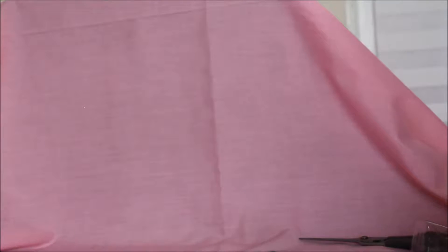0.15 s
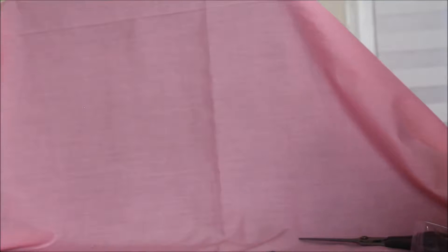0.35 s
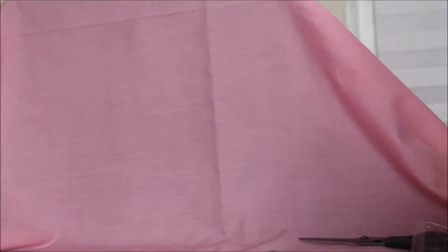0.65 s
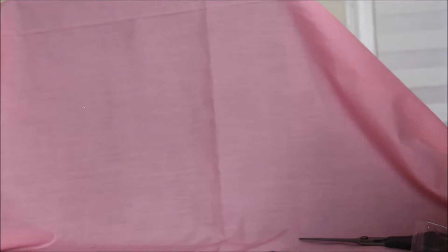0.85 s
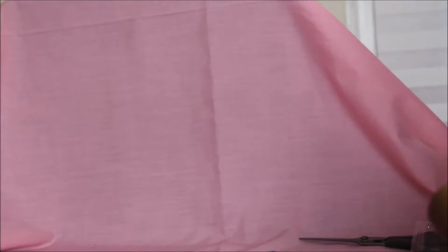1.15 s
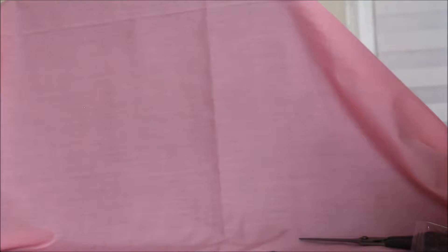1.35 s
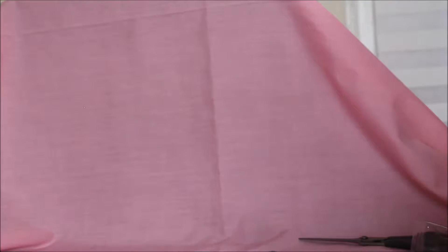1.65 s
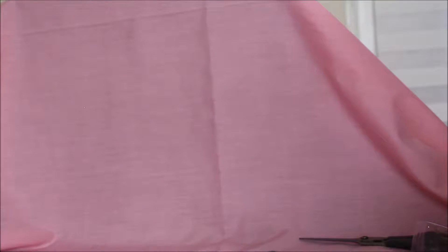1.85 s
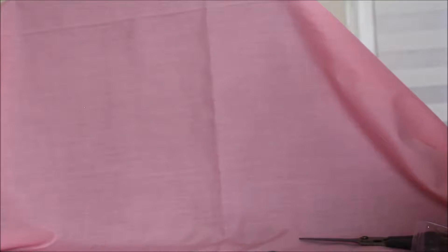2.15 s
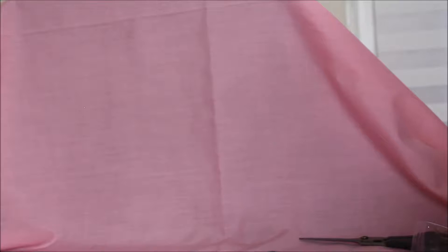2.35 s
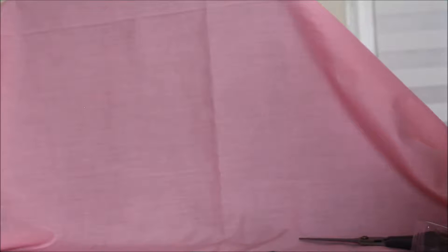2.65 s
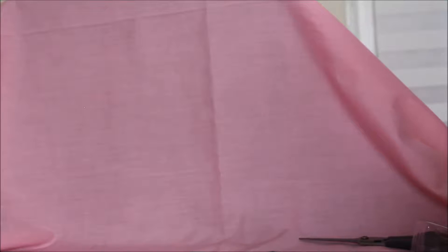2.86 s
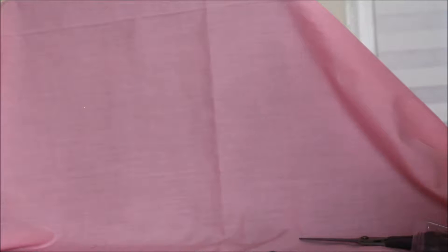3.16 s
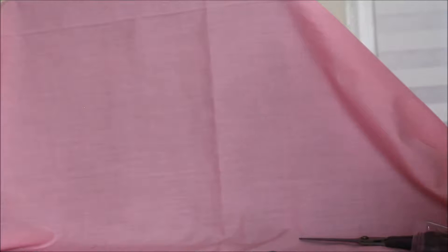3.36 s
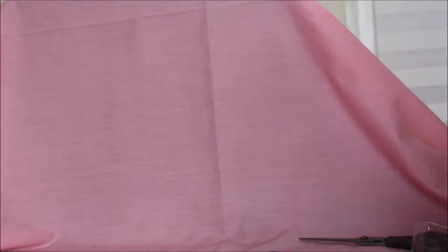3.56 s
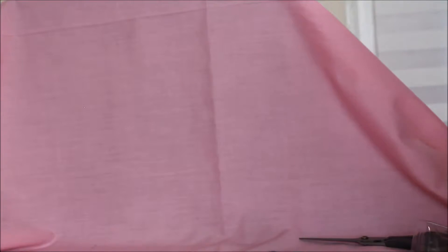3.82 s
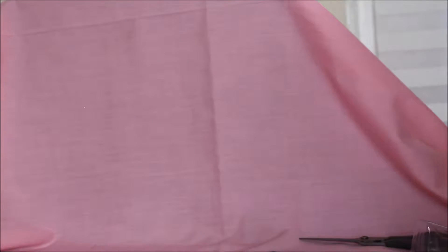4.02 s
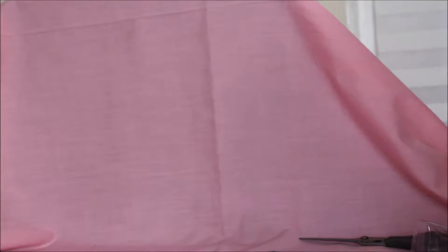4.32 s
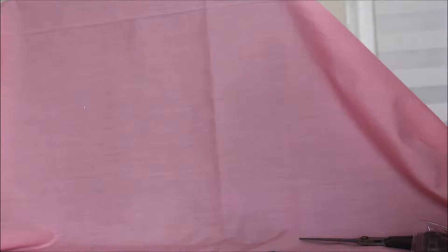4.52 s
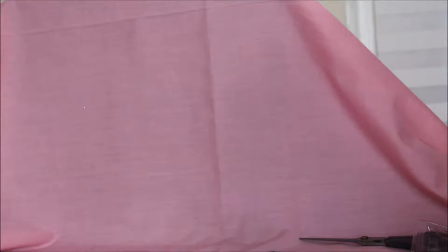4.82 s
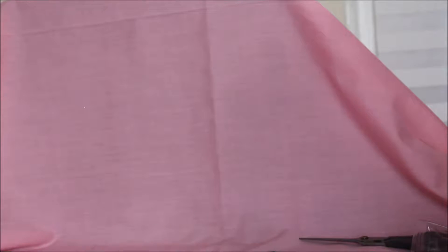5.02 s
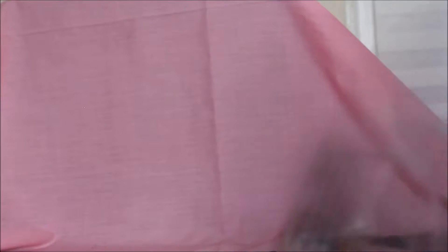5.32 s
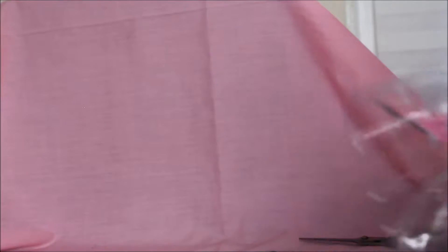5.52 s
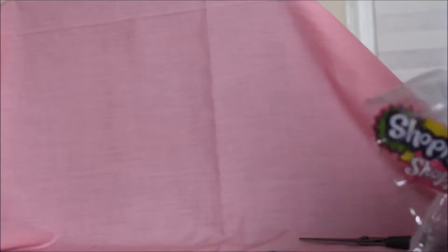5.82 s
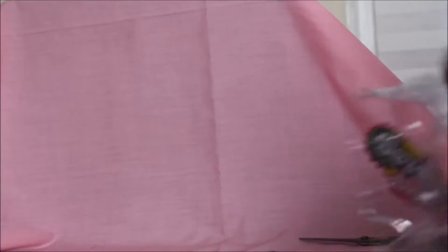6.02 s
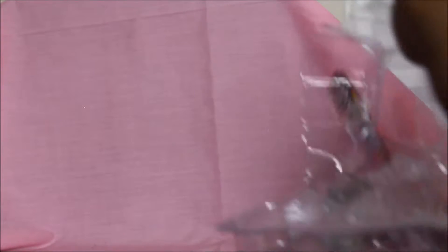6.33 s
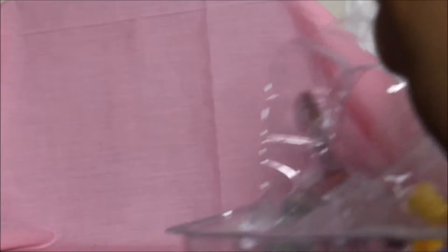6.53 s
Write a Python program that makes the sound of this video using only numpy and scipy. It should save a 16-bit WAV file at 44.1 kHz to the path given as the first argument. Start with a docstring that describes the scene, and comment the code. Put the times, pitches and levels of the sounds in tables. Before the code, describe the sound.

Stiff clear plastic packaging snaps, crackles and crinkles close to the microphone as it is worked free of a toy box in a small room.

```python
"""Sharp snaps from the panels of a stiff clear plastic blister pack, worked out of a toy box close to the microphone.
Each snap is a kick and a noisy shiver through a resonant panel; small ticks and crackling grains fill the gaps.
Blisters pop as short hollow sines, taut parts sing as narrow noise, and the sheet drags on the box in rough swells.
The strongest jerks thump the table; a small room answers, with air, rumble and a faint mains hum underneath."""
import sys
import numpy as np
from scipy import signal
from scipy.fft import rfft, irfft
from scipy.io import wavfile
from scipy.ndimage import uniform_filter1d

SR = 44100
rng = np.random.default_rng(int(sys.argv[2]) if len(sys.argv) > 2 else 0)


def to_wav(sig):
    """Store sig (one row per channel, or 1-D mono) as 16-bit WAV at the path in sys.argv[1].

    Samples outside -1..1 are clipped; the rate is SR.
    """
    pcm = np.clip(np.atleast_2d(sig), -1, 1) * 32767
    pcm = np.round(pcm).astype(np.int16)
    wavfile.write(sys.argv[1], SR, pcm.T)  # frames by channels


N = 294588
TIME = np.arange(N) / SR


def snaps(kick_ring_db=12.5, kick_width=0.15, shiver_ring_db=4.5, shiver_width=0.24,
          shiver_t60=0.13, crack_db=-3.5, crack_t60=0.017):
    """A panel flips with one sharp kick and rings briefly at its pitch; then bending waves scatter through the sheet."""
    # Panels buckling. Each row: start in seconds, panel pitch in Hz, strength in dB before the body shelf,
    # brightness in dB per octave, body in dB, shiver against the kick in dB.
    buckles = [(0.0295, 1930, -21, -3, -1, -4.5), (0.1387, 1810, -22, -9, -23, 9),
               (0.2356, 1460, -19.5, -5, -10, -3), (0.273, 2290, -13.5, -4.5, -0.5, 4),
               (0.3106, 910, -18.5, -11.5, -8, -2), (0.4271, 1290, -14, -5, -12, 16),
               (0.435, 1380, -25, -4, 8, 13), (0.449, 720, -15, -2, 13.5, -8),
               (0.4549, 3600, -20, 6, -6, 1), (0.612, 4000, -26.5, 1, 0, 17),
               (0.7019, 1330, -18.5, -9.5, -12, -3), (0.873, 2630, -28.5, 5.5, 4, 7),
               (0.8965, 1550, -27.5, -3.5, 8, 7), (0.9422, 883, -25, 1, -9, 3),
               (0.963, 2180, -22, -6.0, 2, 21), (1.014, 2750, -24, 24, 5, 8),
               (1.0431, 540, -17.5, -6, -4, 9), (1.0572, 1590, -15, -4, 1.5, -1.5),
               (1.069, 1290, -18.5, -5, -18, -12), (1.168, 1720, -35, 3, 13, 16),
               (1.1931, 910, -19.5, -14, -12, 3.5), (1.3966, 1090, -17, -4, -13, 4),
               (1.4791, 3100, -19.5, -3, -1, -7), (1.628, 785, -18.5, -13.5, -2, -12),
               (1.7143, 2357, -19, 5, -1, 2), (1.9053, 690, -28, -5, 17, -8),
               (1.9758, 740, -26.5, -5.5, 2, 10), (2.004, 498, -27.5, -5.5, 10, 6),
               (2.0238, 2120, -23.5, -5, -4, 2), (2.2817, 970, -22.5, -1, 11.5, 9),
               (2.3432, 950, -20.5, -3, -1, 5), (2.486, 2200, -17.5, 0.0, -2, -1),
               (2.5265, 456, -23.5, -7, 0.5, 9), (2.6127, 1760, -25, -4, -6, -1),
               (2.6599, 3100, -13, 1, 15.5, 10), (2.7785, 1270, -32, -3.5, 8, 7),
               (2.9673, 950, -24.5, -4, -10, 5), (3.0368, 1090, -18.5, -3.5, 1, 3),
               (3.0968, 1190, -16.5, -8, -19.5, 28), (3.2558, 910, -19, -2.5, 4.5, 4),
               (3.2655, 650, -15.5, -7, -2.5, 2.5), (3.4043, 3200, -28.5, 6.5, 2, 7),
               (3.4429, 2280, -12, -1.5, -15, 1), (3.4814, 2570, -18, -7.5, -1.5, -7),
               (3.556, 1010, -13, -9, -27, -3), (3.6245, 940, -25.5, 0, 18, 10),
               (3.8176, 975, -30.5, -8.5, -11, 5), (3.894, 2084, -28.5, -1.5, 5, 4),
               (3.918, 2700, -20, 0, 20.5, 15), (3.951, 2330, -17.5, -2.0, 11, 11),
               (4.041, 824, -26.5, 1.5, 1, 7), (4.119, 528, -9, -11.5, -3.5, -7),
               (4.1857, 3500, -21, -6, -3, 7), (4.248, 616, -18, -4.5, -13, 8),
               (4.3024, 636, -20, -1.5, 8, 3.5), (4.3373, 1100, -15, -1.5, 8, 11),
               (4.5441, 1630, -21.5, -1, -16, 6), (4.57, 640, -16.5, -7, -5.5, 8),
               (4.5842, 1185, -14.5, 2, 9, 4.5), (4.673, 890, -18, -12.5, -16, 2),
               (4.7122, 1950, -23, 0, -1, 16), (4.7573, 2380, -12.5, -0.5, 7, 1),
               (4.901, 3980, -19.5, -1.5, 11, 2.5), (4.9292, 372, -23, -0.5, 5, -2.5),
               (5.003, 910, -24.5, -6, -2, 3), (5.0468, 710, -27, -3, -6, 12),
               (5.1011, 2450, -24, 3.5, 5, 3), (5.244, 1330, -24.5, -1.5, -13, 15),
               (5.289, 2530, -22, 3, -2, 10), (5.2996, 400, -5, -3.5, -7.5, 3.5),
               (5.315, 1020, -10, -1, -10, -1.5), (5.4211, 3700, -22.5, -1, 16, -3),
               (5.4357, 2820, -26, 4, 35, -4), (5.4747, 760, -21, -0.5, 14, 6.5),
               (5.4867, 3530, -20, -1, 17, -13), (5.594, 623, -21.5, -9, -10, -2),
               (5.6255, 550, -25, -9, 5, 4), (5.6753, 1960, -20.5, 0.5, -3, 1),
               (5.694, 720, -17.5, -9, 4, 1), (5.7213, 443, -27.5, -3.5, 8, -20),
               (5.7582, 580, -26, -5.5, 9, 0), (5.8413, 586, -27.5, -5, 9, 4),
               (6.0518, 1297, -23.5, -5.5, -1, 3), (6.134, 2150, -13.5, -0.5, -1, -3)]
    out = np.zeros(N)
    t = np.arange(SR // 10) / SR
    for start, hz, db, tilt_db, body_db, scatter_db in buckles:
        # a strong shiver takes its share of the strength from the kick
        strength = from_db(db) / np.sqrt(1 + from_db(scatter_db) ** 2 / 2)
        kick = panel_response(hz, tilt_db, body_db, kick_ring_db, kick_width)
        add(out, start, strength * kick)
        # the fold runs across the panel in a millisecond or two, the shiver lasts longer
        waves = burst(t, crack_t60, crack_db) + burst(t, shiver_t60, scatter_db)
        sheet = panel_response(hz, tilt_db, body_db, shiver_ring_db, shiver_width)
        add(out, start, strength * signal.fftconvolve(waves, sheet))
    return out


def panel_response(hz, tilt_db, body_db, ring_db, ring_width, spread_s=0.000892, size=2048):
    """Response of a panel: a tilted arch with one resonance, rms 1 over 10 ms; the pack's body then shelves the lows."""
    # The sheet radiates little bass and little top. Each row: frequency in Hz, gain in dB.
    radiation = [(40, -56), (130, -16.5), (210, 5), (270, -9), (420, 3), (1000, -1.5), (4200, -2.5),
                 (5600, -0.5), (8800, 0), (10500, -8), (13000, -22), (16000, -77)]
    # the arch tips with the brightness of the snap and levels off at its ends
    arch_hz, arch_db, arch_octaves = 1920, 2, (-2.22, 1.98)
    body_hz = 557   # below this the whole pack swings with a snap, more or less as it is held
    f = np.fft.rfftfreq(size, 1 / SR) + 1

    width = ring_width * max(hz / 1000, 1) ** 0.67   # small panels are damped more
    detuning = (f / hz - hz / f) / width
    ring = np.sqrt(1 + from_db(ring_db) ** 2 / (1 + detuning ** 2))
    ring /= np.sqrt(1 + (min(hz / 2, 300) / f) ** 6)   # little is radiated far below the pitch

    octaves = np.clip(np.log2(f / arch_hz), *arch_octaves)
    arch = tilt_db * octaves - arch_db * octaves ** 2
    colour = rms_one(ring * from_db(arch + at_hz(radiation, f)))
    body = from_db(body_db / (1 + (f / body_hz) ** 4))
    response = causal(colour * body) * np.sqrt(SR // 100)

    # bending waves are dispersive: the lows arrive a little after the highs
    delay_s = spread_s / np.sqrt(1 + f / 1500)
    phase = 2 * np.pi * np.cumsum(delay_s) * SR / size
    return irfft(rfft(response) * np.exp(-1j * phase))


def burst(t, t60, db):
    """Dying noise whose energy is given in dB against a unit click."""
    noise = rng.standard_normal(len(t)) * from_db(-60 * t / t60)
    return noise * from_db(db) / np.linalg.norm(noise)


def pops():
    """The air in a blister swings for a few cycles, a hollow knock with no bass beneath it."""
    # Whole blisters turning inside out.
    # Each row: start in seconds, pitch in Hz, starting level in dB before the band-pass, 60 dB decay in seconds.
    blisters = [(1.3993, 1190, 6.5, 0.0047), (3.0977, 1060, 7, 0.013), (4.1195, 596, 4, 0.019),
                (5.2994, 378, 2.5, 0.028)]
    out = np.zeros(N)
    t = np.arange(SR // 15) / SR
    for start, hz, db, t60 in blisters:
        swing = from_db(db - 60 * t / t60) * np.sin(2 * np.pi * hz * t)
        add(out, start, band(swing, hz / 2, 10 * hz))
    return out


def singing():
    """A cluster of close modes rings on, beating as it fades."""
    # Taut parts that sing on after a snap.
    # Each row: start in seconds, centre in Hz, width in Hz, starting level in dB, 60 dB decay in seconds.
    taut_parts = [(0.454, 5560, 800, -19, 0.17), (0.5, 5700, 900, -48, 4.4), (4.188, 3040, 500, -27, 1),
                  (5.103, 2420, 211, -18, 0.19), (5.101, 5050, 400, -28, 0.26),
                  (6.134, 2560, 1510, -19, 0.2)]
    out = np.zeros(N)
    t = np.arange(SR) / SR
    for start, hz, width_hz, db, t60 in taut_parts:
        modes = band(rng.standard_normal(len(t)), hz - width_hz / 2, hz + width_hz / 2)
        add(out, start, evened(modes, size=900) * from_db(db - 60 * t / t60))
    return out


def ticks(crinkle_db, per_s=22, level_db=-2.5, spread_db=6.0, tilt_db=-1.0, tilt_spread_db=4.5,
          low_hz=450, high_hz=3500, ring_db=12.5, ring_width=0.19, shiver_t60=0.18, shiver_db=7.5):
    """Small buckles between the snaps, each with its own pitch and a short shiver, as strong as the crinkling is."""
    out = np.zeros(N)
    t = np.arange(SR // 20) / SR
    chances = rng.random((600, 5))
    for keep, when, pitch, size, bright in chances:
        if keep * len(chances) >= per_s * N / SR:
            continue
        waves = burst(t, shiver_t60, shiver_db) + (t == 0)   # shiver plus a unit kick
        db = crinkle_db[int(when * N)] + level_db + spread_db * (2 * size - 1)
        hz = low_hz * (high_hz / low_hz) ** pitch
        tilt = tilt_db + tilt_spread_db * (2 * bright - 1)
        panel = panel_response(hz, tilt, 0, ring_db, ring_width)
        add(out, when * N / SR, from_db(db) * signal.fftconvolve(waves, panel))
    return out


def crinkle(levels_db, per_s=240, spread_db=2.5, colour_db=1.0, crease_s=0.0006, rub_db=-9, count=20):
    """Small creases give way, each a tiny rasp with a colour of its own, over the soft hiss of sliding plastic."""
    # Colour of the crinkling. Each row: frequency in Hz, relative density in dB per Hz.
    spectrum = [(59, -44), (100, -14), (123, -20), (152, -15), (196, 0.5), (324, -1), (391, -3), (502, 3.5),
                (797, -5), (1290, -9.5), (2130, -11.5), (8700, -19), (10700, -29), (12400, -62),
                (15000, -61)]
    creases = clicks(per_s, spread_db)
    at = np.flatnonzero(creases)
    edges = np.geomspace(130, 13500, count + 1)
    layers = np.zeros((3, N))   # flexing, crinkling, fine creasing
    for k, (low, high) in enumerate(zip(edges, edges[1:])):
        hz = np.sqrt(low * high)
        hits = np.zeros(N)
        hits[at] = creases[at] * from_db(colour_db * rng.standard_normal(len(at)))
        energy = signal.lfilter([1], [1, -np.exp(-1 / (crease_s * SR))], hits ** 2 + 1e-18)
        rasps = evened(np.sqrt(energy))
        grains = np.hypot(rasps, from_db(rub_db)) * rng.standard_normal(N)
        layer = np.searchsorted([700, 3500], hz)
        # neighbouring bands alternate in sign
        layers[layer] += (-1) ** k * band(grains, low, high) * from_db(at_hz(spectrum, hz))
    return sum(rms_one(x) * from_db(db) for x, db in zip(layers, levels_db))


def handling():
    """Levels in dB of flexing, crinkling and fine creasing: all follow the effort; crumples swell the last two."""
    # How hard the hands work the sheet. Each row: time in seconds, crinkling level in dB.
    effort_curve = [(0.0, -34.5), (0.35, -42), (0.95, -34.5), (1.3, -39), (1.7, -40), (2.18, -35.5),
                    (2.32, -40), (2.55, -45), (2.75, -48), (3.0, -33), (3.2, -43.5), (3.45, -35.5),
                    (3.8, -52), (4.02, -36.5), (4.35, -36.5), (4.5, -46), (4.7, -43.5), (5.42, -34.5),
                    (5.65, -49.5), (5.85, -36.5), (5.98, -47), (6.12, -36), (6.35, -70), (6.68, -67)]
    # A patch of the sheet crumples.
    # Each row: middle in seconds, length in seconds, level in dB, fine creasing against that level in dB.
    crumples = [(0.67, 0.14, -31.5, -3.5), (1.031, 0.036, -23.5, -7.5), (2.44, 0.12, -34, 0),
                (3.03, 0.05, -34.5, -4), (3.545, 0.016, -26.5, -3.5), (3.978, 0.063, -24.5, -6.5),
                (4.03, 0.056, -27.5, -13), (4.313, 0.066, -28, 0), (5.451, 0.039, -25.5, -8),
                (6.13, 0.035, -34, -11)]
    # level at mean effort, and share of the effort's swing
    flex_db, flex_follows = -44, 0.44   # wide panels flexing
    crease_db, crease_follows = -48, 0.7   # fine creasing
    effort, = in_time(effort_curve)
    swing = effort - effort.mean()
    crinkling = from_db(effort) ** 2
    creasing = from_db(crease_db + crease_follows * swing) ** 2
    for middle, length, db, fine_db in crumples:
        swell = from_db(db) ** 2 * np.exp(-2 * ((TIME - middle) / length) ** 2)
        crinkling = crinkling + swell
        creasing = creasing + swell * from_db(fine_db) ** 2
    return flex_db + flex_follows * swing, 10 * np.log10(crinkling), 10 * np.log10(creasing)


def drags(slips_per_s=900, spread_db=3.0):
    """The sheet sticks and slips on cardboard in short, rough swells."""
    # The sheet dragging over the box. Each row: middle in seconds, length in seconds, level in dB.
    strokes = [(0.248, 0.028, -31.5), (1.044, 0.028, -20.5), (1.065, 0.028, -15), (1.365, 0.056, -35),
               (1.812, 0.017, -29), (2.028, 0.039, -28), (2.123, 0.067, -29), (3.485, 0.022, -29),
               (4.017, 0.03, -23), (5.697, 0.07, -24), (5.79, 0.036, -29), (6.061, 0.018, -35),
               (6.329, 0.015, -38), (6.658, 0.17, -47)]
    # The box booms under the drag. Each row: frequency in Hz, relative gain in dB.
    box_colour = [(60, -22), (120, -6.5), (160, -8), (200, 3), (255, -4), (400, -1.5), (620, -1),
                  (1000, -4.5), (1600, -7.5), (2600, -14.5), (6000, -24.5), (9000, -60)]
    pressure = np.zeros(N)
    for middle, length, db in strokes:
        pressure += from_db(db) * np.exp(-2 * ((TIME - middle) / length) ** 2)
    slips = evened(clicks(slips_per_s, spread_db))
    return pressure * coloured(slips, box_colour)


def thumps(hz=70, t60=0.01):
    """The table answers a jerk with a dull, short swing."""
    # Jerks that reach the table. Each row: start in seconds, starting level in dB before the band-pass.
    jerks = [(0.45, -24), (1.399, -42), (2.659, -15), (3.444, -15)]
    out = np.zeros(N)
    t = np.arange(SR // 5) / SR
    for start, db in jerks:
        add(out, start, from_db(db - 60 * t / t60) * np.sin(2 * np.pi * hz * t))
    return band(out, 38, 400)


def room(x, build_s=0.078, wall_hz=9000, t60=0.36, tail_db=-17):
    """A few close reflections, then a short diffuse tail."""
    # Near surfaces. Each row: delay in seconds, level in dB.
    reflections = [(0.0115, -17), (0.024, -20), (0.035, -16.5)]
    t = np.arange(SR * 3 // 5) / SR
    tail = band(rng.standard_normal(len(t)), 98, wall_hz, order=1)
    tail *= from_db(-60 * t / t60) * (1 - np.exp(-t / build_s))
    response = tail * from_db(tail_db) / np.linalg.norm(tail)
    for delay, db in reflections:
        response[round(delay * SR)] += from_db(db)
    return x + signal.fftconvolve(x, response)[:N]


def background(air_db=-53, hum_hz=120.6, hum_db=-55):
    """Room air as coloured noise, low rumble as band-passed noise and mains hum as a sine."""
    # Room air. Each row: frequency in Hz, relative gain in dB.
    air_colour = [(25, -8), (44, 7), (65, -8), (120, 10), (250, -15), (600, -1.5), (2000, -6), (8000, -22),
                  (13000, -41)]
    # The table rumbles faintly under the hands. Each row: time in seconds, level in dB.
    rumble_curve = [(0.0, -55), (0.9, -60), (1.05, -41), (1.5, -65), (2.6, -48), (3.5, -54.5), (4.0, -46),
                    (5.2, -59), (5.55, -60), (6.68, -56)]
    air = from_db(air_db) * coloured(rng.standard_normal(N), air_colour)
    rumble_db, = in_time(rumble_curve)
    rumble = from_db(rumble_db) * rms_one(band(rng.standard_normal(N), 32, 132))
    hum = from_db(hum_db) * np.sqrt(2) * np.sin(2 * np.pi * hum_hz * TIME)
    return air + rumble + hum


def from_db(db):
    """Decibels to gain."""
    return 10 ** (np.asarray(db) / 20)


def rms_one(x):
    """Scale to unit rms."""
    return x / np.sqrt(np.mean(x ** 2) + 1e-20)


def in_time(rows):
    """Each column of a curve at every sample."""
    seconds, *columns = np.transpose(rows)
    return [np.interp(TIME, seconds, column) for column in columns]


def at_hz(points, hz):
    """Read a spectrum on a log-frequency axis."""
    f, db = np.transpose(points)
    return np.interp(np.log(hz + 1e-9), np.log(f), db)


def band(x, low_hz, high_hz, order=2):
    """Causal band-pass."""
    edges = [low_hz, min(high_hz, SR * 9 / 20)]
    sos = signal.butter(order, edges, "band", fs=SR, output="sos")
    return signal.sosfilt(sos, x + 1e-18)


def coloured(x, spectrum):
    """Give a steady sound a spectrum; rms 1."""
    gain = from_db(at_hz(spectrum, np.fft.rfftfreq(N, 1 / SR)))
    return rms_one(irfft(rfft(x) * gain, N))


def add(track, start, sound):
    """Mix a short sound in at a start in seconds."""
    at = max(round(start * SR), 0)
    track[at:at + len(sound)] += sound[:max(N - at, 0)]


def clicks(per_s, spread_db):
    """Random clicks, many small and a few large."""
    sizes = from_db(spread_db * np.minimum(rng.exponential(1, N), 4))
    signs = rng.choice([-1, 1], N)
    return sizes * signs * (rng.random(N) < per_s / SR)


def evened(x, size=2600):
    """Hold the running level near 1 while single grains still stand out."""
    power = np.maximum(uniform_filter1d(x ** 2, size), 0)
    return x / np.sqrt(power + 0.089 * np.mean(x ** 2))


def causal(gain):
    """The most compact impulse response that has this gain on an even grid from 0 to SR / 2."""
    cepstrum = irfft(np.log(gain + 1e-9))
    half = len(cepstrum) // 2
    cepstrum[1:half] *= 2
    cepstrum[half + 1:] = 0
    return irfft(np.exp(rfft(cepstrum)))


def scene(pop_room_share=0.35):
    """The pack in its room, one channel; the pops are aimed at the microphone and so are drier."""
    knocks = pops()
    levels_db = handling()
    plastic = snaps() + singing() + ticks(levels_db[1]) + crinkle(levels_db)
    in_room = room(plastic + pop_room_share * knocks + drags() + thumps())
    direct = (1 - pop_room_share) * knocks
    return (in_room + direct + background())[None]


def record(dry, cutoff_hz=16000):
    """The loudest peaks overload the input; the deep bass and the top are cut."""
    clipped = np.clip(dry, -1, 1)
    low_cut = signal.butter(2, 38, "high", fs=SR, output="sos")
    top_cut = signal.cheby2(16, 80, cutoff_hz + 500, fs=SR, output="sos")
    return signal.sosfilt(top_cut, signal.sosfilt(low_cut, clipped))


dry = scene()
out = record(dry)
to_wav(out)
```